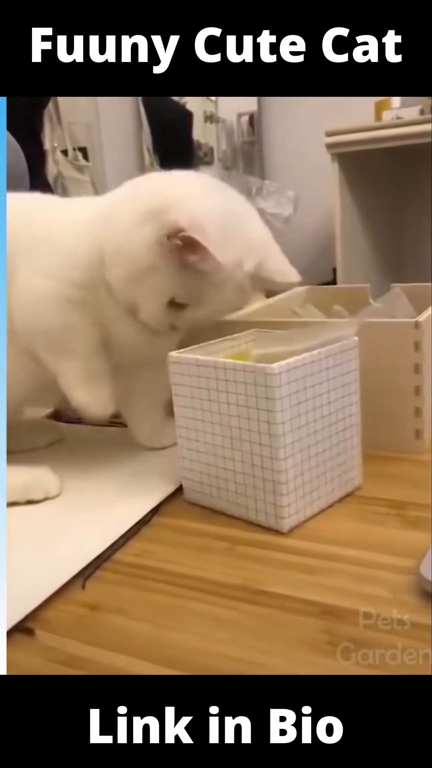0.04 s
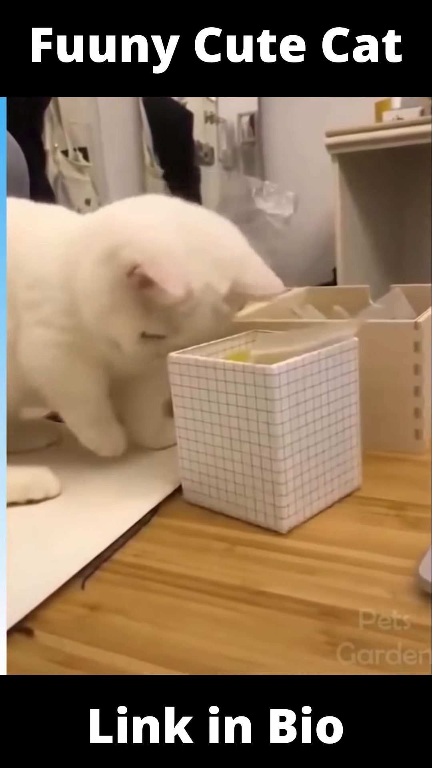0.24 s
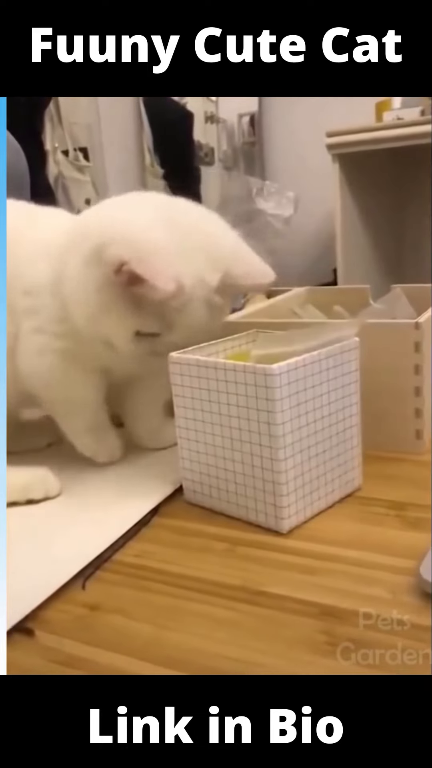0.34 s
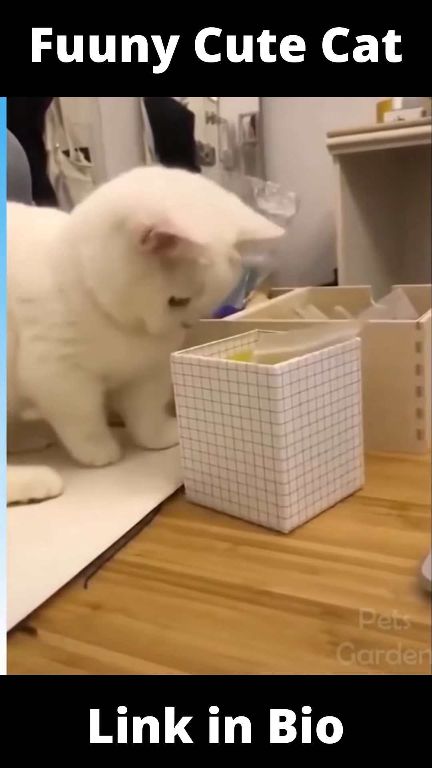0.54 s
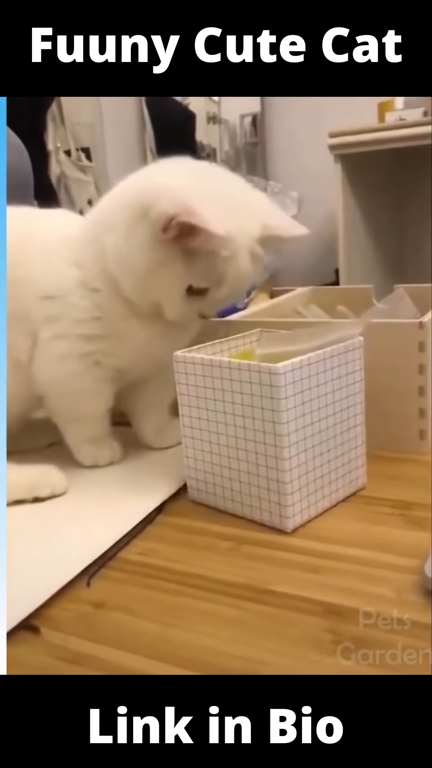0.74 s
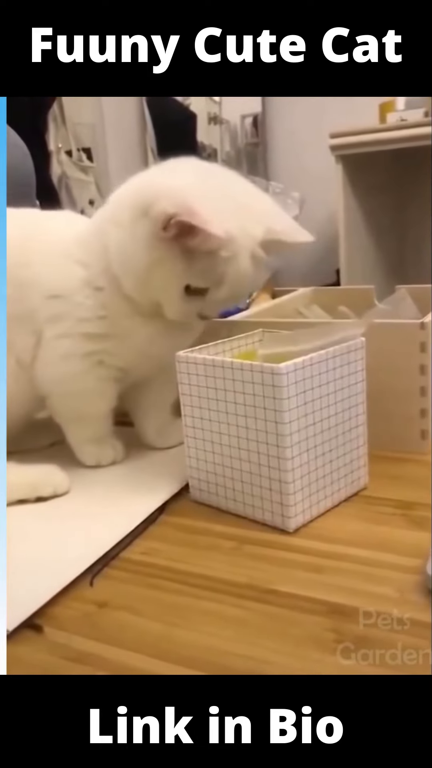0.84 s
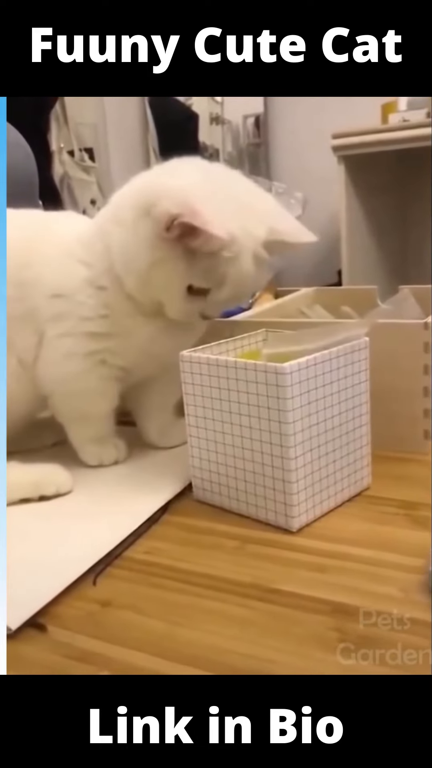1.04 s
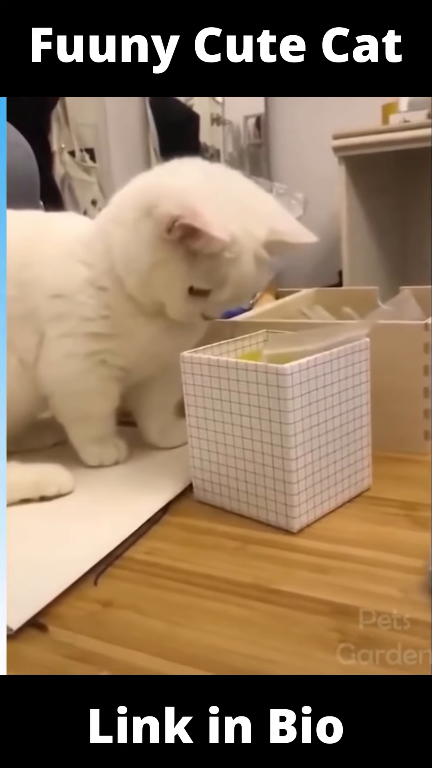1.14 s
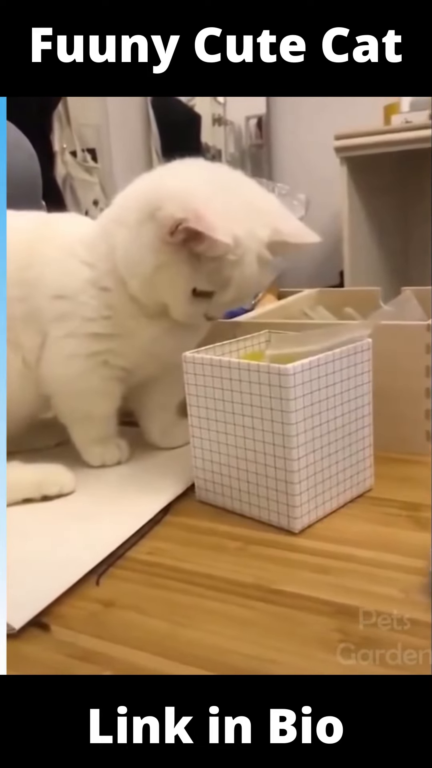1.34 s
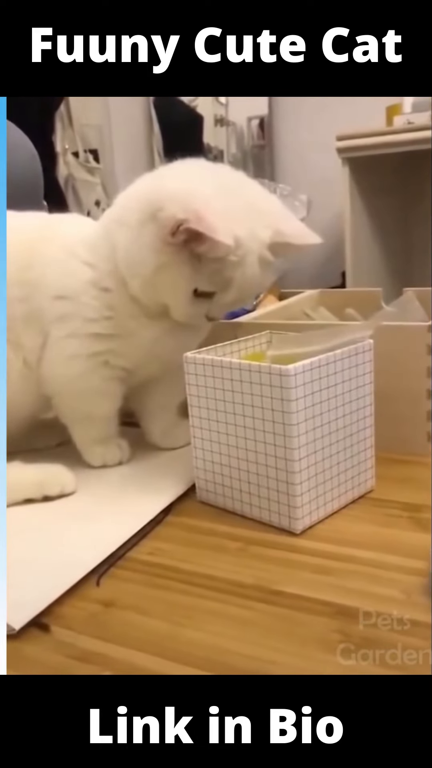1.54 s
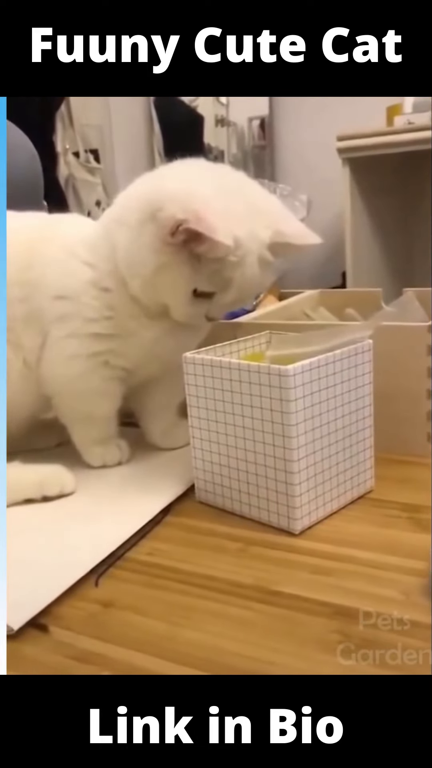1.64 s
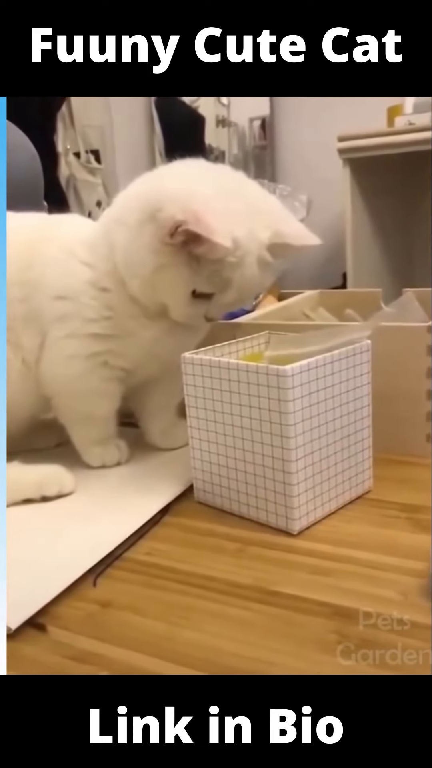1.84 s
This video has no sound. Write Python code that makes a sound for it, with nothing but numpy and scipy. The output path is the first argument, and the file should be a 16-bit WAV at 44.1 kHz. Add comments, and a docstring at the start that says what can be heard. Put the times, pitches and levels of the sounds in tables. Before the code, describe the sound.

One hollow knock as a cat tips a cardboard box onto wood, followed by light ticks.

```python
"""A small cardboard box, pawed by a cat, drops flat on a wooden desk with a hollow knock.
Tilted, it creaks in tiny slips; on landing, box, desk and low room modes ring together.
It skids with friction grains, then its walls rattle and tick as it settles.
The cat's paw and fur brush it with a soft hiss; an appliance hums in the quiet room."""
import sys
import numpy as np
from scipy import signal
from scipy.io import wavfile
from scipy.ndimage import uniform_filter1d, minimum_filter1d

SR = 44100
rng = np.random.default_rng(int(sys.argv[2]) if len(sys.argv) > 2 else 0)


def bounce(signal):
    """Save signal as a 16-bit WAV file at the path given by the first command-line argument."""
    frames = np.transpose(np.atleast_2d(signal))
    limited = np.clip(frames, -1, 1)
    pcm = np.round(limited * 32767).astype(np.int16)
    wavfile.write(sys.argv[1], SR, pcm)


N = 83790
T = np.arange(N) / SR


def amp(db):
    """dB to gain."""
    return 10 ** (np.asarray(db) / 20)


def unit(x):
    """Scale to rms 1."""
    return x / np.sqrt(np.mean(x ** 2) + 1e-20)


def read(points, hz):
    """Interpolate a table over log frequency."""
    points_hz, value = np.transpose(points)
    return np.interp(np.log(hz + 1), np.log(points_hz + 1), value)


def add(mix, start_s, sound):
    """Mix in at start_s, cropped to fit."""
    start = round(start_s * SR)
    sound = sound[max(-start, 0):]
    part = mix[max(start, 0):][:len(sound)]
    part += sound[:len(part)]


def colour(x, points, size=4096):
    """Minimum-phase filter, unit energy, shaped by (freq_hz, gain_db) points."""
    log_gain = np.log(amp(read(points, abs(np.fft.fftfreq(size, 1 / SR)))))
    response = np.exp(np.conj(signal.hilbert(log_gain)))
    fir = np.fft.ifft(response).real[:size // 2]
    return signal.fftconvolve(x, fir / np.linalg.norm(fir))[:len(x)]


def brighten(x, tilt_db_per_oct):
    """Spectral tilt over 500-8000 Hz, rms kept."""
    tilted = colour(x, [(500, 0), (8000, 4 * tilt_db_per_oct)])
    return unit(tilted) * np.sqrt(np.mean(x ** 2))


def resonate(x, hz, q, gain_db):
    """Input plus one resonant band."""
    return x + amp(gain_db) * signal.lfilter(*signal.iirpeak(hz, q, fs=SR), x)


def decay(t, t60_s):
    """Exponential fall, 60 dB in t60_s."""
    return np.exp(-np.log(1000) * t / t60_s)


def burst(t60_s, size=8192):
    """Noise with instant onset and exponential decay."""
    return rng.standard_normal(size) * decay(T[:size], t60_s)


def ring(modes, size, rise_cycles=0.82):
    """Struck damped modes, alternating in sign."""
    t, out = T[:size], np.zeros(size)
    for k, (hz, db, t60_s) in enumerate(modes):
        rise = 1 - np.exp(-t * hz / rise_cycles)
        out += (-1) ** k * amp(db) * rise * decay(t, t60_s) * np.sin(2 * np.pi * hz * t)
    return out


def rubs():
    """Paw and fur on cardboard: swells of hiss, each stirring one resonance."""
    # strokes: start_s, length_s, level_db, tilt_db_per_oct, resonance_hz
    strokes = [(-.02, 0.08, -54, -2, 3800), (0.082, 0.27, -55.5, -1.5, 4570),
               (0.213, 0.04, -42, -1.5, 1320), (0.81, 0.18, -56, -0.5, 3000), (1.392, 0.058, -59, -1, 1670)]
    # rubbing spectrum: freq_hz, gain_db
    spectrum = [(300, -2), (1300, 1.5), (2400, -6.5), (3900, -3.5), (4600, -11), (5300, 1), (7000, -14),
                (12500, -18), (15000, -33)]
    out = np.zeros(N)
    for start_s, length_s, level_db, tilt_db_per_oct, resonance_hz in strokes:
        hiss = colour(rng.standard_normal(N), spectrum)
        hiss = resonate(hiss, resonance_hz, q=14, gain_db=3.5)
        swell = np.interp(T / length_s, [0, 0.13, 1], [0, 1, 0])
        add(out, start_s, amp(level_db) * swell * brighten(unit(hiss), tilt_db_per_oct))
    return out


def background(air_db=-54, hum_db=-54, hum_hz=134.2):
    """Steady room noise and appliance hum."""
    # room noise spectrum: freq_hz, gain_db
    spectrum = [(15, -14), (36, 2), (60, -1.5), (110, -15), (280, -15.5), (420, -23), (750, -22.5),
                (1000, -20.5), (1500, -28), (2800, -37), (12500, -46.5), (14000, -64)]
    air = unit(colour(rng.standard_normal(2 * N), spectrum, size=16384)[N:])
    hum = np.sqrt(2) * np.sin(2 * np.pi * hum_hz * T)
    return amp(air_db) * air + amp(hum_db) * hum


def creaks():
    """Strained cardboard slips: a snap plus grit, coloured by the fold that gives way."""
    # slips: start_s, gain_db, resonance_hz
    slips = [(0.0839, -39.5, 3560), (.1, -42, 2300), (.112, -44.5, 6040), (.124, -46, 4900),
             (0.1354, -43, 3870), (0.1519, -39, 4400), (.156, -40, 2170), (.168, -32, 4900),
             (.184, -28.5, 6450), (.2101, -35, 4800), (0.228, -30, 12500), (0.6278, -43, 3850),
             (1.271, -58, 4400), (1.304, -54.5, 4200), (1.396, -49, 4200)]
    # slip spectrum: freq_hz, gain_db
    spectrum = [(300, -20), (1500, -8), (2100, 5.5), (3000, 1), (3900, 4), (4600, 1.5), (5700, -4),
                (6800, -2.5), (8000, -14), (9500, -15.5), (13000, -16), (14000, -48)]
    out = np.zeros(N)
    for start_s, gain_db, resonance_hz in slips:
        slip = 0.68 * burst(t60_s=0.017)
        slip[0] += 0.71  # snap
        fold = resonate(slip, resonance_hz, q=5.1, gain_db=1)
        add(out, start_s, amp(gain_db) * np.std(slip) * unit(colour(fold, spectrum)))
    return out


def knock(start_s=0.2461, ring_db=-11.5, thud_db=-19.5, crack_db=-19.5):
    """The box lands: modal ring, dense hollow thud, crack of first contact."""
    # box, desk and low room modes: freq_hz, gain_db, t60_s
    modes = [(66.7, -23, 0.5), (118.3, -10.5, 0.098), (151.4, -15, 0.32), (196.6, 5, 0.16),
             (198, -5.5, 0.32), (272.3, -15.5, 0.28), (352, -10, 0.26), (461, -3, 0.041),
             (552.7, -1, 0.061), (626.4, -16, 0.38), (723.5, -7.5, 0.15), (854, -20, 0.32),
             (932.4, -16, 0.27), (1021, 7, 0.016), (1079, -16, .26), (1190, -13, 0.07), (1301, -22, .3),
             (1652, -8.5, 0.036)]
    # thud spectrum: freq_hz, gain_db
    thud_spectrum = [(60, -10.5), (120, -4), (300, -0.5), (560, 4), (1100, 0), (1400, -6.5), (2200, -13.5),
                     (3200, -22), (12000, -31.5)]
    # crack spectrum: freq_hz, gain_db
    crack_spectrum = [(1000, 5.5), (2500, 14.5), (3200, -5.5), (4200, 5.5), (4800, -11), (6000, 7),
                      (7200, -11), (8500, -3), (12500, -11), (15000, -44)]
    out = np.zeros(N)
    add(out, start_s, amp(ring_db) * ring(modes, size=N))
    add(out, start_s, amp(thud_db) * colour(burst(t60_s=0.21), thud_spectrum))
    add(out, start_s, amp(crack_db) * colour(burst(t60_s=0.024), crack_spectrum))
    return out


def skid(grains_per_s=7700, spread_db=4):
    """The box slides on the desk: dense friction clicks of uneven size swell and fade."""
    # skid envelope: time_s, level_db
    contour = [(0.27, -44), (0.281, -23), (0.289, -21.5), (0.304, -29), (.33, -33), (.36, -38),
               (0.419, -61)]
    # friction spectrum: freq_hz, gain_db
    spectrum = [(80, 1), (300, 10), (800, 2), (1400, -3), (2100, 3), (3000, -1.5), (4100, 0.5), (5000, -5),
                (10000, -19.5), (12800, -17), (15000, -39)]
    time_s, level_db = np.transpose(contour)
    envelope = amp(np.interp(T, time_s, level_db, left=-120, right=-120))
    clicks = (rng.random(N) < grains_per_s / SR) * rng.choice([-1., 1.], N)
    sizes = amp(spread_db * np.minimum(rng.exponential(1, N), 3))
    return colour(unit(clicks * sizes) * envelope, spectrum)


def taps(favour_db=9.5, favour_width_oct=0.12, grit_db=-8.5):
    """Light contacts ring the box walls; the spot touched favours modes near one frequency."""
    # contacts: start_s, gain_db, tilt_db_per_oct, favoured_hz, boom_db
    contacts = [(0.294, -38, -3, 4240, -4), (0.3094, -19, -3, 2000, 4), (0.3299, -23, -0.5, 4170, -0.5),
                (0.354, -23.5, -0.5, 2940, -10), (.3743, -23, -1.5, 2010, -14), (0.387, -31, 0.5, 2940, -7),
                (0.404, -38, -2, 2070, 0), (0.4507, -24, 0, 3800, -8), (0.466, -29, -0.5, 1690, -3),
                (0.5138, -24.5, 1, 3110, 5), (.523, -27.5, 3.5, 4140, -4), (.555, -27, -1, 1700, 1),
                (.591, -41, 1.5, 1870, 14), (0.6323, -40, 0, 1700, 10.5), (0.68, -43, 0.5, 3110, -6),
                (.698, -44, -7, 1780, -4), (.747, -33, -1.8, 1794, 8.5), (1.1508, -39, -5, 1760, 11)]
    # cardboard wall modes: freq_hz, gain_db, t60_s
    wall_modes = [(815, -7, .024), (943, -5.5, 0.024), (1670, -4, 0.019), (1975, -7.5, 0.018),
                  (2937, -8, 0.027), (3786, -6.5, .02), (4310, -8.5, 0.011), (6120, -21, 0.036)]
    # rough contact spectrum: freq_hz, gain_db
    grit_spectrum = [(550, -9), (900, 3.5), (4000, -5), (7500, -19.5), (9500, -17.5), (12500, -18),
                     (14000, -39)]
    mode_hz, mode_db, t60_s = np.transpose(wall_modes)
    out = np.zeros(N)
    for start_s, gain_db, tilt_db_per_oct, favoured_hz, boom_db in contacts:
        lift_db = favour_db * np.exp(-(np.log2(mode_hz / favoured_hz) / favour_width_oct) ** 2)
        lift_db[:2] += boom_db  # two lowest modes
        walls = 0.53 * ring(zip(mode_hz, mode_db + lift_db, t60_s), size=8192)
        grit = amp(grit_db) * colour(burst(t60_s=0.025), grit_spectrum)
        add(out, start_s, amp(gain_db) * brighten(walls + grit, tilt_db_per_oct))
    return out


def tail(rise_s=0.0047):
    """Diffuse room response, each band decaying at its own rate."""
    # reverb decay: freq_hz, t60_s
    band_decay = [(100, 0.37), (400, 0.73), (900, 0.69), (3000, 0.75), (6000, 1), (13000, 0.88)]
    # reverb strength: freq_hz, gain_db
    band_gain = [(200, -17.5), (500, -14.5), (900, -11), (1800, -9.5), (3100, -9), (4200, -15.5),
                 (6000, -16.5), (13000, -9)]
    hz, t, noise = signal.stft(rng.standard_normal(SR), SR, nperseg=256)
    fade = decay(t, read(band_decay, hz)[:, None]) * np.minimum(t / rise_s, 1)
    energy = SR * np.mean(fade ** 2, axis=1, keepdims=True)
    fade *= amp(read(band_gain, hz))[:, None] / np.sqrt(energy)
    return signal.istft(noise * fade, SR, nperseg=256)[1]


def room(x, drift_hz=2.36, echo_s=0.0152, echo_db=-11, echo_highpass_hz=900):
    """One echo off a near surface; two alternating tails vary the ring from tap to tap."""
    phase = 2 * np.pi * drift_hz * T
    out = sum(signal.fftconvolve(x * share, tail())[:N] for share in (np.cos(phase), np.sin(phase)))
    echo = signal.lfilter(*signal.butter(1, echo_highpass_hz, "high", fs=SR), x)
    add(out, echo_s, amp(echo_db) * echo)
    return out


def scene(creak_send_db=-9.5):
    """Box, reflections and background, mono."""
    box = knock() + skid() + taps() + rubs()
    creak = creaks()
    reflections = room(box + amp(creak_send_db) * creak)
    return (box + creak + reflections + background())[None]


def record(dry, ceiling_db=-4, window_samples=111, lowpass_hz=14200):
    """Fast limiter on the knock's peak, then low-pass."""
    gain = np.minimum(1, amp(ceiling_db) / (abs(dry[0]) + 1e-9))
    held = minimum_filter1d(gain, size=window_samples)
    limited = dry * uniform_filter1d(held, size=window_samples)
    lowpass = signal.firwin(255, lowpass_hz, window=("kaiser", 9), fs=SR)
    return signal.oaconvolve(limited, lowpass[None], "same")


dry = scene()
out = record(dry)
bounce(out)
```